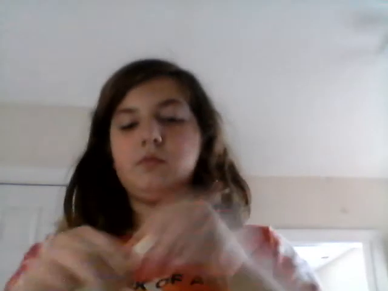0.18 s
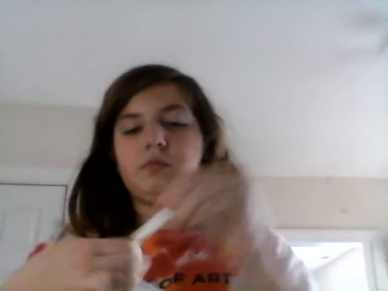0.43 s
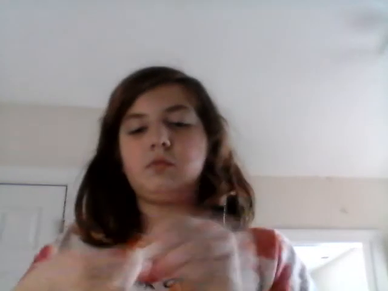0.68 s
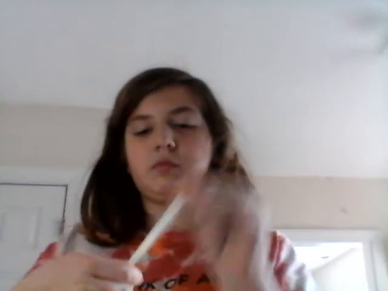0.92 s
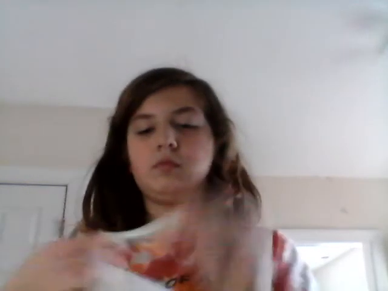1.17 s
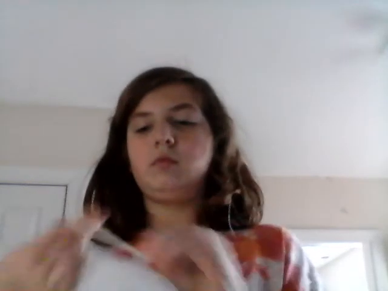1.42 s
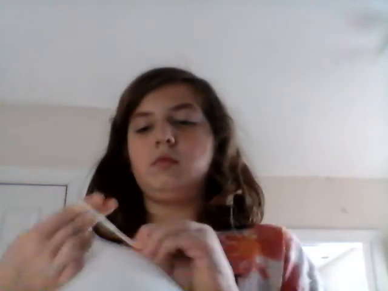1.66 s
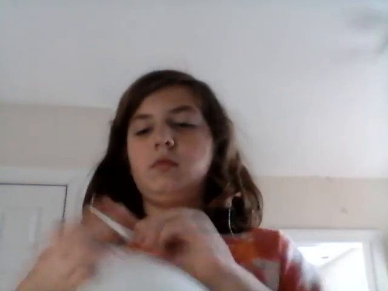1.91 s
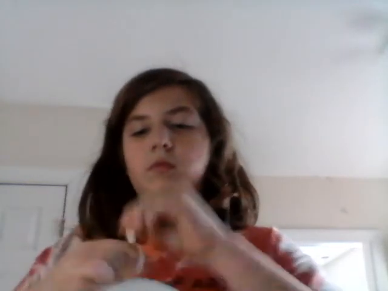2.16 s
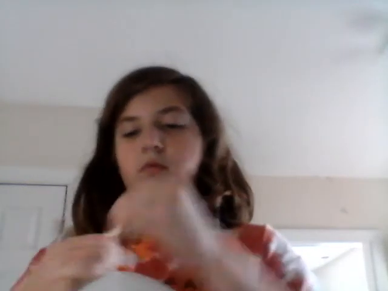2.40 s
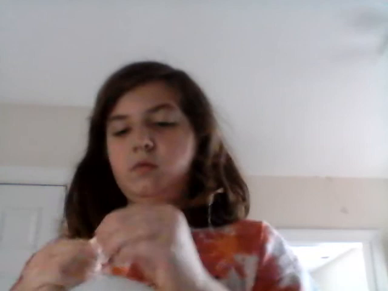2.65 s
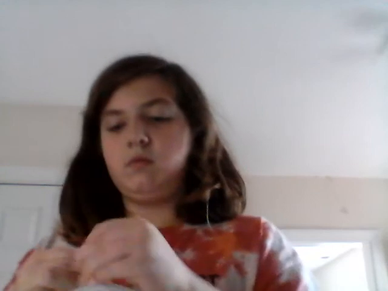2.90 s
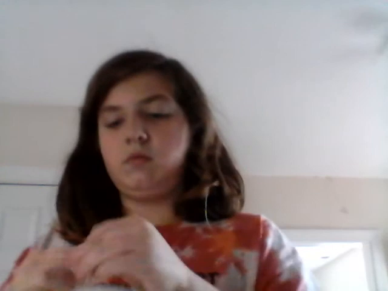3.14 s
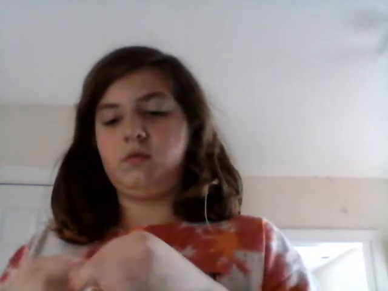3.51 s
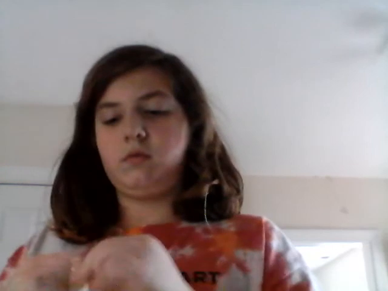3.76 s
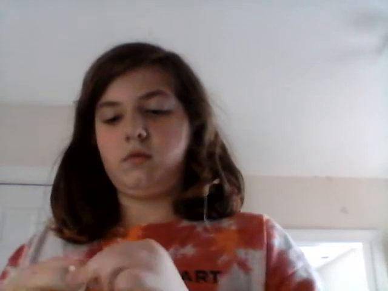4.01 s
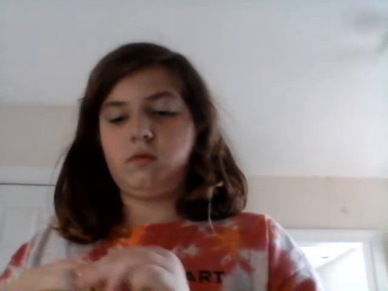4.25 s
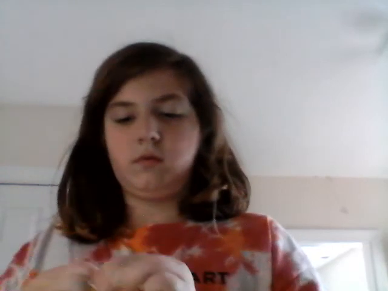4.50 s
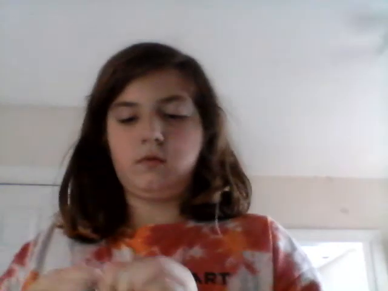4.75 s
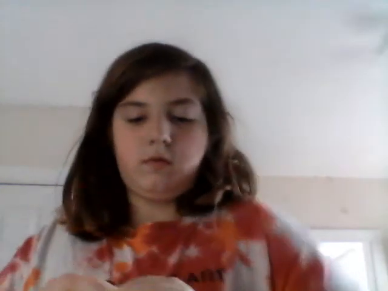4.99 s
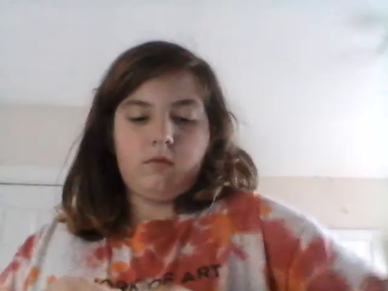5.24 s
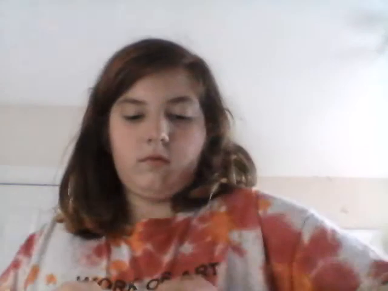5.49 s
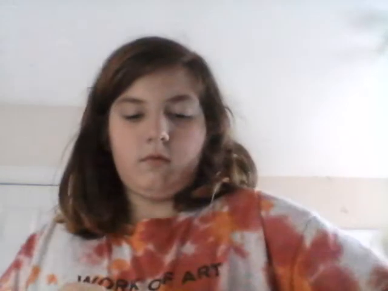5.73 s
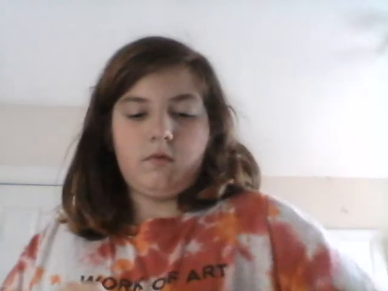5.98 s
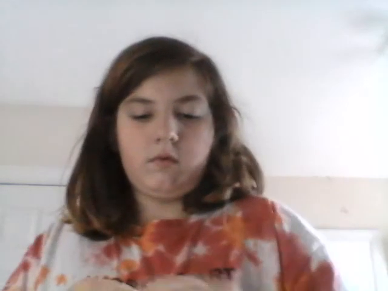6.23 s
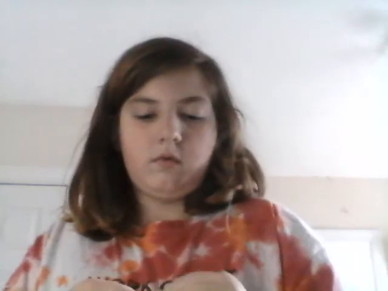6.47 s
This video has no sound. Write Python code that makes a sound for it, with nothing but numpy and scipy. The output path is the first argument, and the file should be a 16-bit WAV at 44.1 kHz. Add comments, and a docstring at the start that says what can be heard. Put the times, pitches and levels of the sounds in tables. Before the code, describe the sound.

Close rubbery creaking and sharp little snaps come in clusters as a slack balloon is tied, followed by soft finger rustle and faint nail ticks.

```python
"""In a quiet room, a limp rubber balloon is stretched and knotted close to a small microphone.
The rubber sticks and slips on the fingers: slow slips snap, quicker ones creak, the quickest squeak.
Trains of slips and single blows ring the modes of the slack skin; squeaks are gliding tones.
Dry fingers hiss as shaped noise, hands push a little air, fingernails tick, and a low room tone drifts."""
import sys
import numpy as np
from scipy import signal
from scipy.fft import rfft, irfft, next_fast_len
from scipy.io import wavfile
from scipy.ndimage import uniform_filter1d, map_coordinates

SR = 44100
rng = np.random.default_rng(int(sys.argv[2]) if len(sys.argv) > 2 else 0)


def log_audio(samples):
    """Write samples as a 16-bit WAV file to the path given in sys.argv[1]."""
    # one column per channel
    frames = np.atleast_2d(samples).T
    # limit to full scale, then quantise
    limited = np.clip(frames, -1, 1)
    pcm = np.round(limited * 32767).astype(np.int16)
    wavfile.write(sys.argv[1], SR, pcm)


N = 291060  # length of the scene in samples

# "Before trim" levels and times are shifted by the settings of the function that plays them.
# Pulls of the rubber through the fingers: (start [s], rise [s], hold [s], release [s],
# skin level before trim [dB], crackle level before trim [dB], slip rate at full effort [1/s],
# pitch where the skin answers best [Hz], unevenness [0-1],
# slowing as the pull slackens [octaves per dB], crackle centre [Hz])
RUBBER_PULLS = [ (.396, 0.00415, 0.0137, 0.0388, -37.5, -63, 193.3, 496, 0.11, 0.23, 2580),
                (.422, 0.06625, 0.0413, 0.1105, -37, -45.5, 184.3, 494, 0.26, -0.07, 2302),
                (0.558, 0.02696, 0.0109, 0.0627, -36.5, -55.5, 189, 393, 0.15, 0, 2374),
                (0.636, 0.0195, 0.0104, 0.052, -42, -70, 180, 370, 0.11, 0, 1700),
                (0.658, 0.02754, 0.012, 0.0505, -37.5, -65, 290, 660, 0.12, 0.46, 1725),
                (0.698, 0.014, 0.025, .035, -40, -53, 185, 381, 0.15, 0.7, 1905),
                (1.15, 0.0156, 0.039, 0.057, -60.5, -62.5, 340, 1400, 0.11, 0, 3670),
                (1.375, 0.0518, 0.1032, 0.1135, -43.5, -51, 140, 678, 0.34, 0.12, 1932),
                (1.643, 0.0127, 0.01207, 0.085, -44.5, -45, 531, 1280, 0.27, 0.68, 2395),
                (1.749, 0.02896, 0.028, 0.097, -41, -58.5, 391, 929, 0.19, 0.5, 1408),
                (1.978, 0.0537, 0.0246, 0.0269, -45, -36, 1019, 1500, 0.22, -0.25, 2286),
                (2.032, 0.0214, 0.014, 0.0727, -35.5, -40, 317.7, 665, 0.17, 0, 2223),
                (2.172, 0.0281, 0.0294, 0.1164, -31, -53.5, 134, 296, 0.24, -0.41, 2186),
                (2.597, 0.014, 0.0212, 0.0516, -45.5, -52, 399, 990, 0.29, 0.4, 2380),
                (2.705, 0.00215, 0.0351, 0.03, -44, -60.5, 126, 190.6, 0.44, -0.1, 4550),
                (3.65, 0.04374, 0.01386, 0.074, -26.5, -38, 377.3, 401, 0.02, 0.28, 4230),
                (3.642, .03, 0.062, 0.082, -38, -41, 400, 1117, 0.3, 0, 1640),
                (3.788, 0.014, 0.0117, 0.0585, -49.5, -63.5, 170, 216, 0.24, 0, 1780),
                (3.996, 0.0099, 0.0834, 0.048, -57.5, -52, 500, 890, 0.42, 0, 2910),
                (4.105, .031, 0.0786, 0.118, -38.5, -46, 158.4, 805, 0.33, -0.37, 2016),
                (4.231, 0.00477, 0.005, 0.0595, -30, -48.5, 176, 446, 0.37, 0.06, 2160),
                (4.25, .02, 0.0375, 0.055, -43, -48, 199.5, 517, 0.33, 1.4, 2120),
                (6.086, 0.0229, 0.01707, 0.1134, -58.5, -44.5, 428, 488, 0.34, -0.1, 2586),
                (6.202, 0.0221, 0.0113, 0.064, -55, -65, 350, 480, 0.32, 0.03, 2470)]
# Runs of snaps as a fold lets go: (start before lag [s], number of snaps [count], gap between them [s],
# crack level before trim [dB], crack centre [Hz], skin thump level before trim [dB],
# pitch where the fold flaps best [Hz])
FOLD_SNAPS = [ (0.3979, 1, 0, -27, 3680, -37.5, 489), (.409, 1, 0, -39.5, 1600, -40.5, 699),
              (0.4393, 2, .0125, -31, 2890, -41.5, 292.5), (0.4639, 1, 0, -29.5, 4600, -36, 198.2),
              (0.4881, 1, 0, -30.5, 2790, -38, 198), (0.5447, 2, 0.0082, -45.5, 2000, -39.5, 400),
              (0.5938, 1, 0, -38, 2000, -40.5, 480), (0.686, 2, .0045, -47, 1500, -37, 600),
              (0.7137, 2, .005, -27.5, 4930, -51, 160.8), (1.413, 1, 0, -36.5, 1860, -42.5, 610),
              (1.4257, 1, 0, -28, 2000, -38.5, 401), (1.4395, 1, 0, -34, 2300, -42, 598),
              (1.4503, 2, .011, -25.5, 2100, -32.5, 285), (1.4729, 1, 0, -45.5, 1900, -35.5, 258),
              (1.4956, 1, 0, -35, 1900, -33, 262), (1.512, 2, .017, -33, 1890, -37, 604),
              (1.5855, 1, 0, -39.5, 2990, -48.5, 700), (1.7746, 1, 0, -38, 1483, -41.5, 945),
              (1.791, 1, 0, -30.5, 2300, -32, 802), (2.044, 1, 0, -26.5, 6500, -42.5, 642.6),
              (2.057, 2, 0.003, -20.5, 2006, -34, 657.4), (2.0698, 1, 0, -25.5, 2800, -30.5, 330),
              (2.113, 1, 0, -31, 2385, -38.5, 278.2), (2.1732, 1, 0, -30, 2430, -41, 492),
              (2.1805, 1, 0, -27, 2470, -34, 607.7), (2.1933, 1, 0, -13.5, 3134, -26, 283),
              (2.2027, 2, .0096, -22, 3630, -25.5, 279), (2.228, 1, 0, -28.5, 1820, -32, 604),
              (2.2436, 1, 0, -29.5, 6000, -42, 401.3), (2.4691, 1, 0, -50.5, 3000, -60, 400),
              (2.4963, 2, .017, -45, 2800, -51.5, 401), (2.5612, 1, 0, -46.5, 2500, -53, 400),
              (2.5937, 1, 0, -34, 2800, -49, 600), (2.5984, 1, 0, -31.5, 2400, -43, 703),
              (2.61, 2, .017, -23, 2620, -41.5, 169.7), (2.687, 1, 0, -37, 4930, -52, 403),
              (2.71, 1, 0, -22, 5260, -30, 261), (2.719, 2, 0.0079, -39, 4020, -39, 200),
              (2.7416, 1, 0, -33.5, 6500, -40, 460), (4.0975, 1, 0, -29, 2850, -60.5, 600),
              (4.124, 1, 0, -26.5, 2470, -54.5, 594), (4.136, 4, .0126, -23.5, 1950, -39, 586),
              (4.2176, 1, 0, -29.5, 6500, -43.5, 600), (4.228, 1, 0, -30.5, 2380, -40, 602.5),
              (4.2336, 1, 0, -17.5, 2564, -24.5, 600), (4.264, 2, .0075, -25, 1900, -39, 544.6),
              (4.2797, 4, 0.011, -23.5, 4770, -45.5, 501.4), (4.2995, 1, 0, -29.5, 5000, -48, 504),
              (4.3065, 1, 0, -29, 1754, -31, 437), (4.3312, 1, 0, -38, 4000, -47, 450),
              (5.1541, 1, 0, -54, 2300, -62, 404), (5.5167, 1, 0, -35, 3310, -62.5, 400),
              (6.101, 2, .003, -23.5, 5600, -61, 400), (6.2086, 1, 0, -28.5, 4800, -47.5, 400)]
# Resonances of the slack skin, before each grip shifts them:
# (pitch [Hz], width [Hz], level when pulled [dB], level when flapping free [dB])
SKIN_MODES = [(119, 20, -1, -2), (178.4, 42, -3.5, -1), (321, 17.6, 0, 8.5), (366.5, 30.6, 9.5, -3),
              (411.3, 52, -1.5, -4.5), (467.2, 36, -3.5, -8), (557.4, 56, 1, -2.5), (662.9, 100, -8, -2.5),
              (849.6, 61, -3, -2), (1059.8, 130, -5, -15.5), (1168, 30, -5, -12), (1405.7, 130, -7.5, -7.5),
              (1810, 61, -6.5, -8.5), (2284, 40, -12.5, -10.5), (2583, 39, -10, -16.5),
              (2905, 46, -10.5, -12)]
# Thin squeaks, before arch and waver bend the pitch: (start [s], length [s], start pitch [Hz],
# end pitch [Hz], level [dB], step from one overtone to the next [dB], pitch waver [0-1])
RUBBER_SQUEAKS = [(1.156, 0.0795, 1341, 1264, -60, -12, 0.07),
                  (1.161, 0.052, 4241, 3953, -58.5, -26.5, 0.07),
                  (1.235, 0.0268, 1293, 1055, -57.5, -22.5, 0.07),
                  (1.231, 0.035, 2865, 2805, -64, -24.5, 0), (1.651, 0.0635, 1748, 1744, -52, -3, 0.16),
                  (1.995, 0.0588, 2323, 2537, -43.5, -2, 0.13),
                  (2.021, 0.0252, 1714, 2061, -45, -22.5, 0.09),
                  (2.286, 0.1073, 3291, 3131, -58.5, -31, 0.08),
                  (2.312, 0.018, 3201, 3147, -50, -31.5, 0.02),
                  (2.371, 0.0142, 4252, 4453, -54.5, -31, 0.09), (6.243, 0.07, 3198, 3302, -60.5, -31, 0.1),
                  (6.363, 0.041, 6400, 6530, -55, -42, 0.06)]
# Colour of the dry hiss of fingers: (frequency [Hz], relative level [dB])
HISS_COLOUR = [(1500, -36.5), (3200, -6.5), (4400, -8.5), (5200, 0), (5900, -6.5), (6600, 1.5), (7400, 2.5),
               (9000, -4.5)]
# Colour of the soft rustle of fingers: (frequency [Hz], relative level [dB])
RUSTLE_COLOUR = [(80, -0.5), (170, 12), (350, 10.5), (900, 0), (1500, -2.5), (2500, -5), (3600, -10.5),
                 (6000, -15)]
# Dull pushes of the hands and sleeves: (start [s], length [s], level before the swell [dB])
HAND_PUSHES = [(.04, .06, -58), (.42, .36, -58), (1.43, .15, -50), (2.04, .1, -55), (2.18, .12, -56),
               (4.2, .11, -48), (6.09, .15, -53)]
# Colour of the room tone: (frequency [Hz], relative level [dB])
ROOM_COLOUR = [(20, -17.5), (50, -21), (105, 1), (150, -6), (185, 2), (220, -2), (360, 0.5), (460, -10),
               (550, -7.5), (900, -16.5), (1050, -17.5), (1700, -26.5), (2800, -32), (8000, -30)]
# How long the walls ring on: (frequency [Hz], time to fall by 60 dB [s])
WALL_DECAY = [(150, 0.416), (1000, 0.23), (4000, 0.1), (8000, 0.268)]
# Frequency response of the microphone: (frequency [Hz], gain [dB])
MICROPHONE_RESPONSE = [(30, -3), (80, 1), (200, 0), (245, -7), (300, -0.5), (1000, 3.5), (3000, -1),
                       (7100, -4), (8000, -12.5), (8700, -22.5), (9200, -37)]
# Modes of a fingernail: (pitch [Hz], relative level [dB], time to fall by 60 dB [s])
NAIL_MODES = [(2870, -4.5, 0.0076), (3948, -7.5, 0.00595), (5160, -2, 0.00616), (7209, 0.5, 0.00643),
              (8373, 2.5, 0.00393)]
# Fingernail ticks: (time [s], peak level [dB], pitch whose nearby modes ring most [Hz])
NAIL_TICKS = [(.055, -37.5, 8350), (3.048, -31, 5830), (3.174, -40.5, 6560), (3.268, -39.5, 7630),
              (3.415, -37.5, 5960), (4.38, -41, 6810), (5.052, -28, 6790), (5.418, -40, 8100),
              (5.519, -34, 5790)]
# Strokes of dry fingers over the rubber: (start [s], rise [s], hold [s], release [s],
# hiss level [dB], soft rustle level before trim [dB])
FINGER_STROKES = [ (0.025, 0.013, 0.0607, 0.11, -61.5, -66), (0.149, 0.023, 0.00816, 0.15, -54.5, -58),
                  (.15, 0.2253, 0.1352, .2, -63, -52.5), (0.896, 0.0414, 0.019, 0.044, -65, -70.5),
                  (1.14, 0.024, 0.033, 0.028, -58, -58), (1.184, 0.2335, 0.092, 0.28, -45, -53),
                  (1.628, 0.03, 0.146, 0.068, -55, -55), (1.936, 0.0716, 0.085, 0.5, -42, -46.5),
                  (2.157, 0.052, 0.037, 0.16, -56.5, -53.5), (2.279, 0.0986, 0.0185, 0.074, -55.5, -53),
                  (2.48, 0.0334, 0.0114, 0.144, -61, -61.5), (2.578, 0.0777, 0.121, 0.33, -57, -62),
                  (3.111, 0.0456, 0.0214, 0.21, -55, -55), (3.65, 0.0257, 0.0657, 0.047, -48, -46.5),
                  (3.721, 0.0911, 0.0346, 0.1274, -46, -56.5), (3.992, 0.0162, 0.00994, 0.07, -44.5, -53),
                  (3.96, 0.0865, 0.018, 0.61, -46.5, -53), (4.223, 0.081, 0.0466, 0.059, -53.5, -54.5),
                  (4.453, 0.0795, 0.0088, 0.023, -61.5, -109), (4.617, 0.0723, 0.00535, 0.342, -58, -76),
                  (4.767, 0.0308, 0.016, 0.025, -62.5, -57), (5.492, 0.0146, 0.0344, 0.19, -65, -60),
                  (6.061, 0.02615, 0.1054, 0.169, -47.5, -51.5), (6.215, 0.0402, 0.1035, 0.3, -55, -58.5),
                  (6.332, 0.0525, 0.0484, 0.051, -44.5, -54.5), (6.396, 0.0333, 0.0606, 0.054, -53, -55.5)]

ROOM_DB, ROOM_DRIFT_DB = -62.5, 4  # middle level of the room tone and size of its slow drift
TOP_HZ = 9130  # the microphone passes nothing from here up
# Each movement climbs this far over its rise, and falls this far in each release time
PULL_DEPTH_DB, STROKE_DEPTH_DB = 20, 31
CRACKLE_SWING = 1.087  # the crackle swings wider than the skin as the effort changes
RUB_DB = -14  # rustle of the fingers under a pull, before the pull's own level
SNAP_LOSS_DB = 0.5  # each snap of a run is this much weaker than the one before
SQUEAK_ARCH = 0.04995  # a squeak bends up by about this share of its pitch in the middle


def amp(db):
    """Turn decibels into gain."""
    return 10 ** (np.asarray(db) / 20)


def unit(x):
    """Scale a sound to an average (rms) level of 1."""
    return x / np.sqrt(np.mean(x ** 2) + 1e-20)


def along(points, hz):
    """Read a curve of (frequency, value) points on a log frequency axis."""
    f, v = np.transpose(points)
    return np.interp(np.log(hz + 1), np.log(f + 1), v)


def wobble(rate, size):
    """Draw a smooth random curve with this many random points a second."""
    points = rng.standard_normal(int(size * rate / SR) + 4)
    return map_coordinates(points, [np.arange(size) * rate / SR])


def filtered(x, response):
    """Multiply the spectrum of a sound by a response that depends on frequency."""
    m = next_fast_len(len(x) + 8192)
    return irfft(rfft(x, m) * response(np.fft.rfftfreq(m, 1 / SR)), m)[:len(x)]


def noise(colour, size):
    """Make random noise of rms 1 with this colour."""
    return unit(filtered(rng.standard_normal(size), lambda f: amp(along(colour, f))))


def resonance(f, hz, width):
    """Response of one damped mode: strongest at its pitch, ringing only after it is driven."""
    return 1j * f * width / (hz * hz - f * f + 1j * f * width)


def add(track, s, sound):
    """Mix a sound into the track at time s."""
    part = track[max(round(s * SR), 0):][:len(sound)]
    part += sound[:len(part)]


def effort(rise, hold, release, depth_db):
    """Level in dB of one hand movement: it swells, holds and dies away."""
    rise, hold, release = max(rise, .001), max(hold, 0), max(release, .005)
    t = np.arange(int((rise + hold + 2 * release) * SR)) / SR
    before = 1 - t / rise
    after = (t - rise - hold) / release
    return -depth_db * np.maximum(np.maximum(before, after), 0)


def patchy(x, depth_db, order=3, size=11):
    """The contact travels over the rubber: narrow bands swell and fade by different random amounts."""
    z = signal.stft(x, nperseg=256)[2]
    field = rng.standard_normal(z.shape)
    for _ in range(2):
        # smooth over neighbouring bands, then over time
        field = uniform_filter1d(uniform_filter1d(field, order, 0), size, 1)
    return unit(signal.istft(z * amp(depth_db * unit(field)), nperseg=256)[1][:len(x)])


def room_tone():
    """A low background noise whose level drifts slowly."""
    level_db = ROOM_DB + ROOM_DRIFT_DB * wobble(6.5, N)
    return amp(level_db) * noise(ROOM_COLOUR, N)


def strokes(rustle_db=-1, grain_db=1.5, pressure_db=0.82):
    """Dry skin slides over the rubber in tiny catches that make the hiss and rustle uneven."""
    out = np.zeros(N)
    for s, rise, hold, release, high_db, low_db in FINGER_STROKES:
        effort_db = effort(rise, hold, release, STROKE_DEPTH_DB)
        size = len(effort_db)
        catches = unit(amp(grain_db * wobble(450, size) + pressure_db * wobble(45, size)))
        hiss = amp(high_db) * patchy(noise(HISS_COLOUR, size), depth_db=2.5)
        rustle = amp(low_db + rustle_db) * patchy(noise(RUSTLE_COLOUR, size), depth_db=3)
        add(out, s, amp(effort_db) * catches * (hiss + rustle))
    return out


def pushes():
    """The hands push a little air: dull noise that swells and fades."""
    out = np.zeros(N)
    dull = [(20, -41.5), (65, 3.5), (150, -7.0), (300, -13.5), (900, -74.0)]  # (frequency [Hz], level [dB])
    for s, length, db in HAND_PUSHES:
        size = int(length * SR)
        add(out, s, amp(db) * np.hanning(size) * noise(dull, size))
    return out


def nails(lead_db=-16, lead_s=0.0042, focus_oct=0.504, attack_s=0.0005):
    """Fingernails catch on each other: a faint touch, then a thin tick that rings the modes near its centre."""
    out, t = np.zeros(N), np.arange(SR // 20) / SR
    for s, db, centre_hz in NAIL_TICKS:
        tick = 0
        for hz, level_db, t60 in NAIL_MODES:
            phase = 2 * np.pi * hz * t + 0.585 * wobble(1740, len(t))
            closeness = np.exp(-(np.log2(hz / centre_hz) / focus_oct) ** 2 / 2)
            tick += amp(level_db - 60 * t / t60) * closeness * np.sin(phase)
        tick *= 1 - np.exp(-t / attack_s)
        tick /= np.abs(tick).max()
        add(out, s - lead_s, amp(db + lead_db) * tick)
        add(out, s, amp(db) * tick)
    return out


def dispersed(x, delay_s):
    """Rubber carries treble faster than bass: each slip becomes a short falling chirp (delay at 1000 Hz)."""
    return filtered(x, lambda f: np.exp(-4j * np.pi * delay_s * np.sqrt(1000 * f)))


def skin(force, best_hz, focus_db, grip_db, tension_spread, flapping=False):
    """The skin rings, pulled or flapping free; each new grip shifts its modes and favours those near best_hz."""
    modes = []
    grips = rng.standard_normal((len(SKIN_MODES), 2))
    for k, ((hz, width, pull_db, flap_db), (loudness, tension)) in enumerate(zip(SKIN_MODES, grips)):
        favour_db = focus_db * (np.exp(-np.log2(hz / best_hz) ** 2) - 1)
        db = (flap_db if flapping else pull_db) + favour_db + grip_db * loudness
        sign = (-1) ** (k // 2)  # the modes push in or out in pairs
        modes.append((sign * amp(db), hz * np.exp(tension_spread * tension), width))

    def response(f):
        return sum(g * resonance(f, hz, width) for g, hz, width in modes) / (1 + 1j * f / 2500)

    return dispersed(filtered(force, response), 0.0006129)


def crackle(force, hz, shift_rate=45, spread=1.362, width_hz=1300, rim_hz=5000, rim_width_hz=1500,
            rim_db=-7, top_hz=6000, grit_db=-8, grit_t60=0.011):
    """The taut patch under the finger rings grittily around hz, drifting in colour, under a fixed bright rim."""
    turn = 1.66 * wobble(shift_rate, len(force))  # the colour drifts as the contact travels
    t = np.arange(SR // 50) / SR
    # grit is noise that fades after every slip; energy falls twice as fast in these dB
    energy = signal.fftconvolve(force ** 2, amp(-120 * t / grit_t60))[:len(force)]
    grit = unit(np.sqrt(np.abs(energy)) * rng.standard_normal(len(force)))
    drive = unit(force) + amp(grit_db) * grit

    def ring(centre_hz, width):
        return filtered(drive, lambda f: resonance(f, centre_hz, width) / (1 + (f / top_hz) ** 12))

    low = np.abs(np.cos(turn)) * ring(hz / spread, width_hz)
    high = np.abs(np.sin(turn)) * ring(hz * spread, width_hz)
    return low - high + amp(rim_db) * ring(rim_hz, rim_width_hz)


def levelled(x, window_s=0.022):
    """Even out the slow level and keep the single slips."""
    power = np.abs(uniform_filter1d(x ** 2, max(int(window_s * SR), 2)))
    return x / np.sqrt(power + np.mean(x ** 2) / 20)


def creaks(size_db=3, skin_db=-3, crackle_db=-2.5, grab_s=0.0039, scrape=0.046):
    """Each pull is an uneven train of slips that crackle and drive the skin, louder and brighter with effort."""
    out = np.zeros(N)
    for (s, rise, hold, release, low_db, high_db, rate, best_hz, uneven, slowing,
         crackle_hz) in RUBBER_PULLS:
        effort_db = effort(rise, hold, release, PULL_DEPTH_DB)
        size = len(effort_db)
        slip_rate = rate * 2 ** (slowing * effort_db) * np.exp(uneven * wobble(300, size))
        phase = np.cumsum(slip_rate) / SR
        # one slip, of random size, each time the phase passes a whole number
        slips = np.diff(np.floor(phase), prepend=-1) * amp(size_db * rng.standard_normal(size))
        # the rubber scrapes briefly after letting go, until it sticks again
        force = slips + scrape * rng.standard_normal(size) * np.exp(-3 * (phase % 1))
        ring = skin(force, best_hz, focus_db=10.5, grip_db=0.96, tension_spread=0.0174)
        body = amp(skin_db) * levelled(ring) + amp(RUB_DB) * noise(RUSTLE_COLOUR, size)
        grit = levelled(patchy(crackle(force, crackle_hz), depth_db=3))
        edge = amp(high_db + crackle_db + CRACKLE_SWING * effort_db) * grit
        grab = np.minimum(np.arange(size) / SR / grab_s, 1)  # short fade-in
        add(out, s, grab * (amp(low_db + effort_db) * body + edge))
    return out


def crack(hz, t60, width_hz):
    """One release at the fingertip: a sharp edge and a gritty tail in a broad resonance, of total energy 1."""
    t = np.arange(SR // 20) / SR
    life = amp(-60 * t / .002) + .3 * amp(-60 * t / t60)
    burst = rng.choice([-1, 1], len(t)) * life
    edge = filtered(burst, lambda f: resonance(f, hz, width_hz) * f / (f + hz))
    return edge / np.linalg.norm(edge)


def flap(best_hz, slap_hz=620, slap_width_hz=600, slap_db=-3):
    """A freed fold slaps once and the skin rings on; peak 1."""
    blow = signal.unit_impulse(SR // 8)
    ring = skin(blow, best_hz, focus_db=10.5, grip_db=5.0, tension_spread=0.038, flapping=True)
    slap = filtered(blow, lambda f: resonance(f, slap_hz, slap_width_hz) / (1 + 1j * f / 1500))
    both = ring / np.abs(ring).max() + amp(slap_db) * slap / np.abs(slap).max()
    return both / np.abs(both).max()


def snaps(crack_db=9, thump_db=2, lag_s=0.0010016, creep_db=-17, creep_s=0.002):
    """A stretched fold lets go in evenly spaced, weakening steps: each a crack, then the skin flaps."""
    out = np.zeros(N)
    for s, count, gap, db, hz, low_db, flap_hz in FOLD_SNAPS:
        for k in range(round(count)):
            at = s + lag_s + k * gap
            strength = amp(-SNAP_LOSS_DB * k)
            # the fold creeps a little just before it gives
            creep = crack(hz, t60=0.063, width_hz=1500)
            add(out, at - creep_s, strength * amp(db + crack_db + creep_db) * creep)
            add(out, at, strength * amp(db + crack_db) * crack(hz, t60=0.013, width_hz=0.501 * hz))
            add(out, at, strength * amp(low_db + thump_db) * flap(flap_hz))
    return out


def squeaks():
    """Taut rubber slips fast enough to sing: a gliding tone with two overtones, hoarse and fluttering."""
    out = np.zeros(N)
    for s, length, start_hz, end_hz, db, overtone_db, hoarse in RUBBER_SQUEAKS:
        u = np.linspace(0, 1, int(length * SR))  # progress from start to end
        waver = hoarse * wobble(1500, len(u))
        flutter_db = 4.5 * wobble(350, len(u))
        glide_hz = start_hz + (end_hz - start_hz) * u
        pitch_hz = glide_hz * np.exp(waver + SQUEAK_ARCH * np.sin(np.pi * u))
        phase = 2 * np.pi * np.cumsum(pitch_hz) / SR
        tone = sum(amp(overtone_db * k) * np.sin((k + 1) * phase) for k in range(3))
        add(out, s, amp(db) * unit(tone * amp(flutter_db) * np.sqrt(u) * (1 - u)))
    return out


def room(x, early_db=-4, tail_db=-13, early_t60=0.0629, desk_hz=550):
    """Desk and chest throw back the treble at once and colour it, the walls ring on."""
    hz, t, z = signal.stft(rng.standard_normal(SR // 2), SR, nperseg=256)
    fade = amp(-60 * t / along(WALL_DECAY, hz)[:, None])
    tail = signal.istft(z * fade, SR, nperseg=256)[1]
    t = np.arange(len(tail)) / SR
    early = rng.standard_normal(len(t)) * amp(-60 * t / early_t60) * (t > .001)
    early = filtered(early, lambda f: (1j * f / (desk_hz + 1j * f)) ** 2)  # cut the bass
    tail = tail * (t > .007)
    echo = amp(early_db) * early / np.linalg.norm(early) + amp(tail_db) * tail / np.linalg.norm(tail)
    return x + signal.fftconvolve(x, echo)[:N]


def scene():
    """Balloon and nails echo in the room; strokes, pushes and the low room tone are added without echo."""
    echoing = room(nails() + creaks() + snaps() + squeaks())
    return (room_tone() + strokes() + pushes() + echoing)[None]


def record(dry):
    """A small microphone with a narrow band."""
    return filtered(dry[0], lambda f: amp(along(MICROPHONE_RESPONSE, f)) * (f < TOP_HZ))[None]


dry = scene()
out = record(dry)
log_audio(out)
```